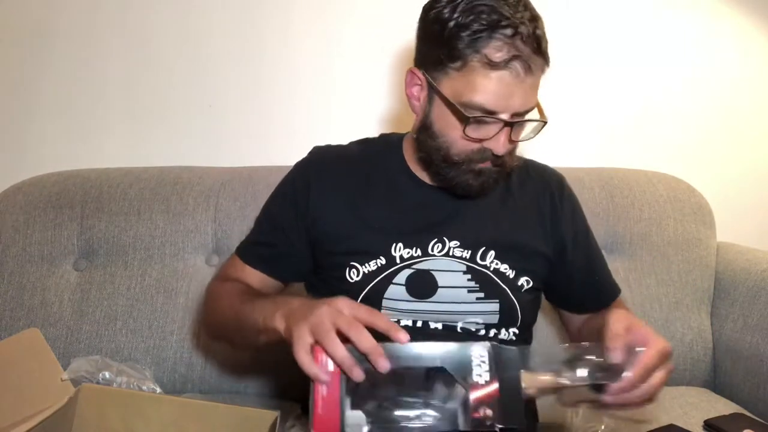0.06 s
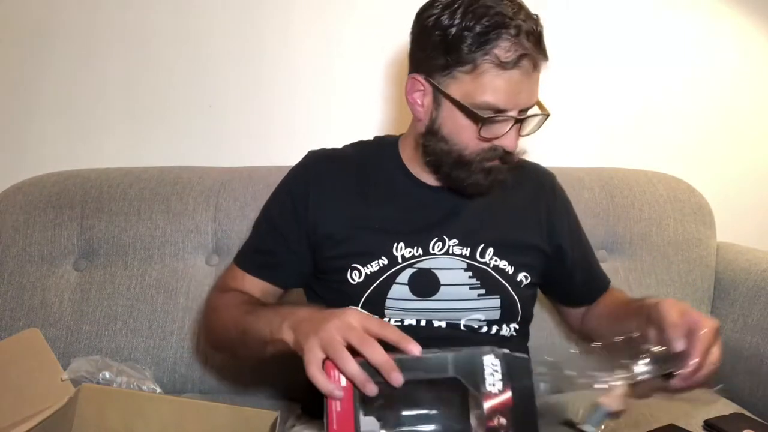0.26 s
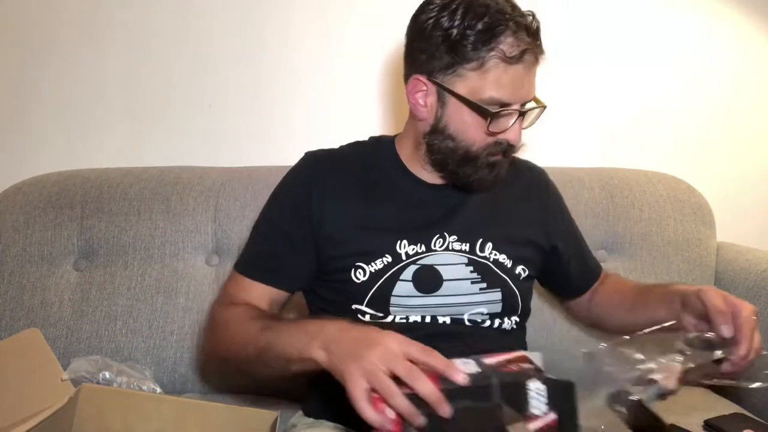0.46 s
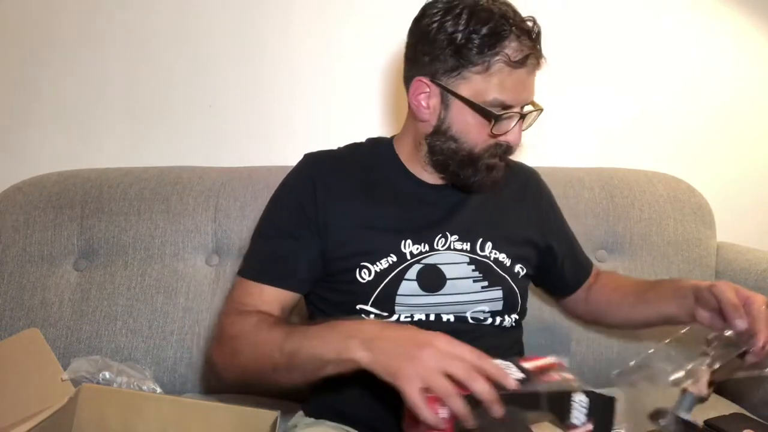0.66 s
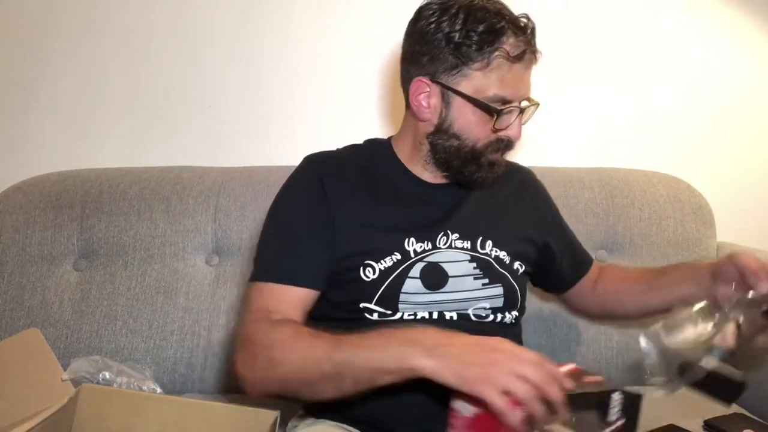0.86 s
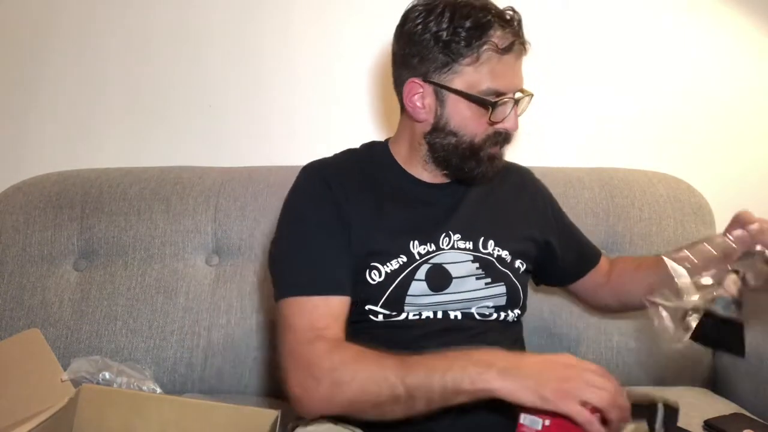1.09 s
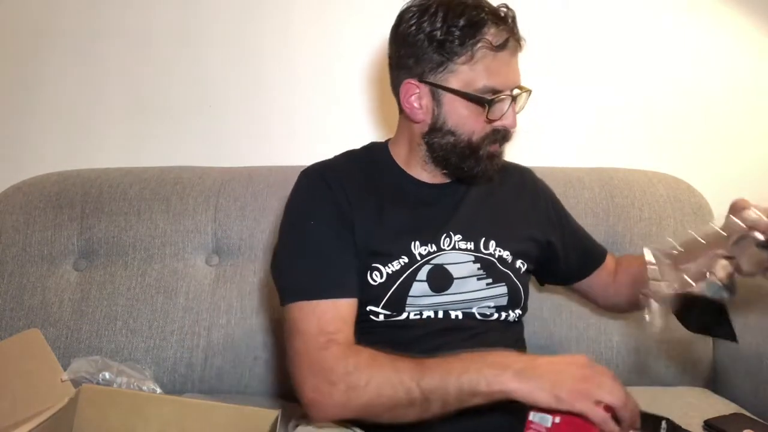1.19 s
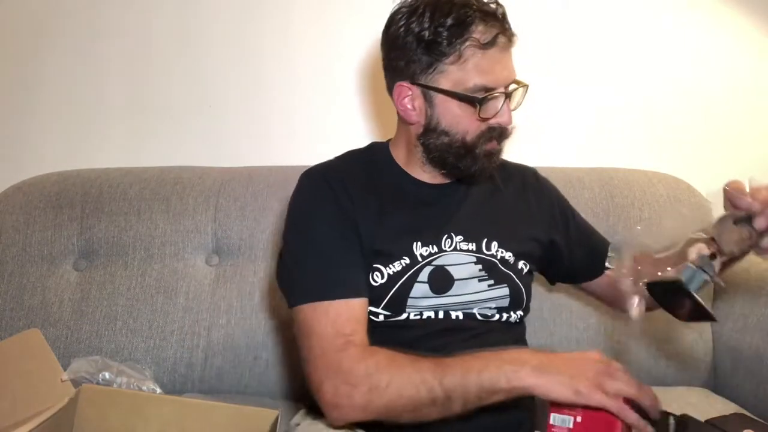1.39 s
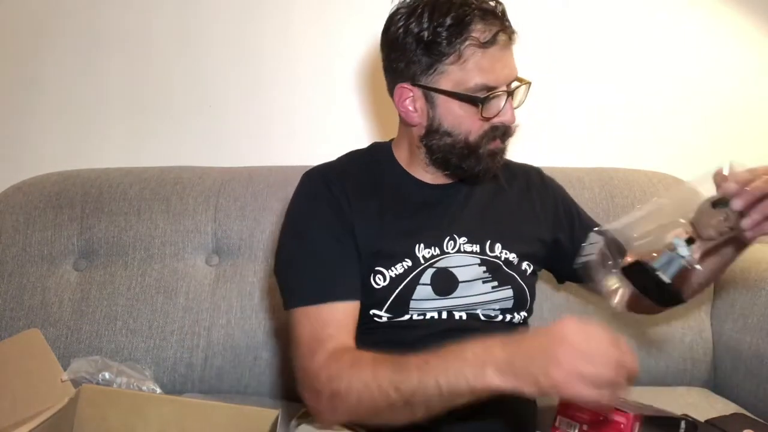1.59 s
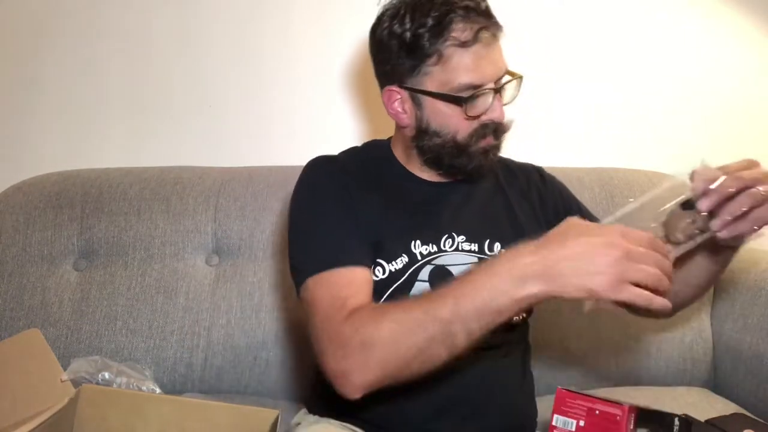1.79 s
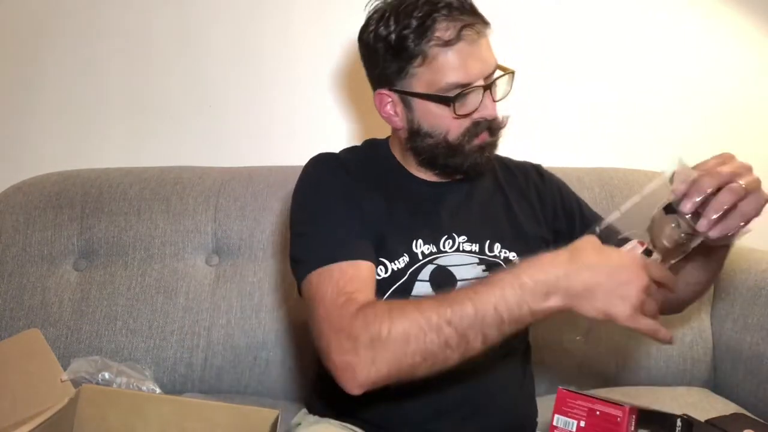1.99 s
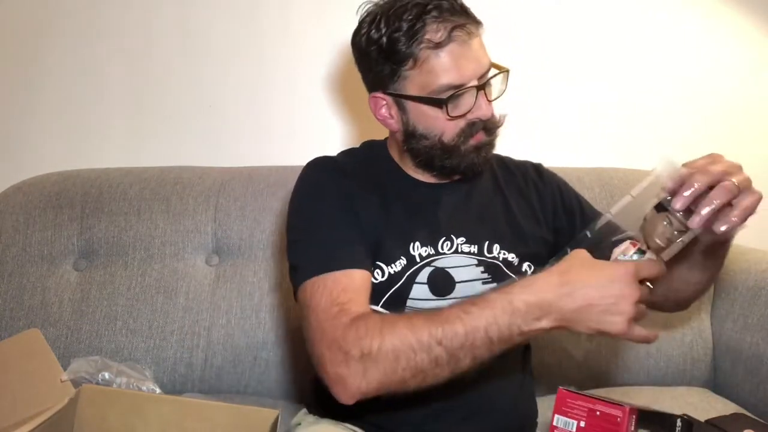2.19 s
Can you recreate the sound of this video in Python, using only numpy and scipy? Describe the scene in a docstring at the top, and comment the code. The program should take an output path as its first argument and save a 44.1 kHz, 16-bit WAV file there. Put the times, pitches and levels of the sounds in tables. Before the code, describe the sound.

Thin plastic packaging juddering and scraping against card, popping free, then soft crinkles and hollow knocks

```python
"""Plastic scrapes and judders along card: a clear tray is pulled out of a cardboard toy box in a living room.
Dense random grains make the scraping and dull rubbing; ringing ticks make crinkles, and a narrow resonance sings.
Dispersed pulses make taps and the double snap as the tray springs free, and chattering grains make rasps.
The empty box is pushed aside with soft rubs, crinkles and hollow taps; fingers take hold of the hollow tray,
which knocks with decaying sines and crackles, over a quiet room tone and diffuse reflections."""
import sys
import numpy as np
from scipy import signal
from scipy.fft import rfft, irfft, next_fast_len
from scipy.io import wavfile

SR = 44100
rng = np.random.default_rng(int(sys.argv[2]) if len(sys.argv) > 2 else 0)


def persist_wave(psi):
    """Save psi, clipped to +-1, as 16-bit WAV."""
    counts = np.round(np.clip(psi, -1, 1) * 32767).astype(np.int16)
    wavfile.write(sys.argv[1], SR, np.atleast_2d(counts).T)


N = 99225   # samples, 2.25 s
TIME_S = np.arange(N) / SR


def amp(db):
    """Decibels to gain."""
    return 10 ** (np.asarray(db) / 20)


def unit(x):
    """Scale to energy 1."""
    return x / np.sqrt(np.sum(x ** 2) + 1e-20)


def at_hz(points, hz):
    """Read a (frequency, value) table on a log-frequency axis."""
    f, v = np.transpose(points)
    return np.interp(np.log(hz + 1), np.log(f), v)


def gain_curve(rows):
    """Join (time, level) rows into a gain per sample."""
    return amp(np.interp(TIME_S, *np.transpose(rows)))


def bins(size):
    """Frequencies of a spectrum in Hz."""
    return np.arange(size // 2 + 1) * SR / size


def shaped(x, db):
    """Causal minimum-phase filter with the given gain per frequency, built by folding the cepstrum."""
    cepstrum = irfft(np.log(amp(np.maximum(db, -90))))
    size = len(cepstrum)
    cepstrum[1:size // 2] *= 2
    cepstrum[size // 2 + 1:] = 0
    response = np.exp(rfft(cepstrum))
    return irfft(rfft(x, size) * response)


def coloured(x, points):
    """Give a long sound a spectrum; rms 1."""
    size = 2 * next_fast_len(N // 2 + 1)
    spectrum = rfft(x, size) * amp(at_hz(points, bins(size)))
    return unit(irfft(spectrum)[:N]) * np.sqrt(N)


def hump(hz, centre_hz, bass_fall, treble_fall):
    """A broad peak with straight flanks, in dB; falls in dB/octave."""
    ratio = ((hz + 1) / centre_hz) ** 8   # the power keeps the top narrow
    bass_loss = bass_fall * np.log2(1 + 1 / ratio)
    treble_loss = treble_fall * np.log2(1 + ratio)
    return -(bass_loss + treble_loss) / 8


def add(out, s, x):
    """Mix a sound in at a time in seconds."""
    i = max(int(s * SR), 0)
    out[i:i + len(x)] += x[:N - i]


def swell(middle_s, length_s):
    """A smooth rise and fall."""
    return np.cos(np.pi * np.clip((TIME_S - middle_s) / length_s, -.5, .5))


def resonated(x, hz, width_hz):
    """One narrow resonance."""
    return signal.lfilter(*signal.iirpeak(hz, hz / width_hz, fs=SR), x)


GRAINS_PER_S, GRAIN_SPREAD_DB = 5600, 2


def grains(size, per_s=GRAINS_PER_S):
    """Tiny slips at random moments, with random sign and uneven strength."""
    strength = amp(GRAIN_SPREAD_DB * np.minimum(rng.exponential(1, size), 4))
    slipping = rng.random(size) < per_s / SR
    return strength * rng.choice([-1, 1], size) * slipping


# Plastic sliding on card, how loud: (time [s], level [dB])
SLIDE = [(0, -51.5), (.1, -56), (.135, -48.5), (.2, -54), (.27, -47), (.315, -47), (.36, -48), (.405, -55),
         (.43, -56), (.62, -70.5), (.72, -63.5), (.8, -78), (1.03, -72.5), (1.07, -62), (1.16, -61.5),
         (1.2, -71.5), (1.3, -63), (1.38, -70), (1.47, -66.5), (1.58, -77.5), (1.93, -78.5), (2.14, -78),
         (2.25, -62)]
# Tone of that scrape: (frequency [Hz], gain [dB])
SLIDE_COLOUR = [(180, -71), (300, 0.5), (685, -3.5), (877, 0.5), (1870, -4.5), (2210, -4.5), (5570, -8),
                (15500, -18)]
SLIDE_GRAINS_PER_S = 5100   # the plastic edge crackles more coarsely than the card


def scrape():
    """Bright friction of plastic on card: dense slips, coloured and ridden in level."""
    return gain_curve(SLIDE) * coloured(grains(N, SLIDE_GRAINS_PER_S), SLIDE_COLOUR)


CRINKLES_PER_S, CRINKLE_DB = 130, -9   # rate over all facets; level relative to SLIDE
CRINKLE_LOW_HZ, CRINKLE_HIGH_HZ, CRINKLE_WIDTH_HZ = 2320, 7540, 240


def crinkles(count=8):
    """The thin sheet buckles as it slides: sparse bright ticks, each ringing one small facet."""
    ticks = np.zeros(N)
    for hz in np.geomspace(CRINKLE_LOW_HZ, CRINKLE_HIGH_HZ, count):
        buckles = grains(N, CRINKLES_PER_S / count) + 1e-18   # tiny offset avoids denormals
        ticks += resonated(buckles, hz, CRINKLE_WIDTH_HZ)
    return amp(CRINKLE_DB) * gain_curve(SLIDE) * unit(ticks) * np.sqrt(N)


# Dull rubbing of hand and card, how loud: (time [s], level [dB])
RUB = [(0, -64), (.09, -75.5), (.14, -49.5), (.19, -59.5), (.24, -48.5), (.32, -52), (.36, -58), (.42, -67),
       (.66, -90), (.72, -55.5), (.82, -84), (1.03, -85.5), (1.15, -75), (1.2, -94), (1.31, -66.5),
       (1.38, -78), (1.46, -60), (1.62, -79), (1.72, -78), (1.81, -72.5), (1.93, -90), (1.98, -51.5),
       (2.07, -70), (2.14, -66), (2.25, -63)]
# Tone of that rubbing: (frequency [Hz], gain [dB])
RUB_COLOUR = [(60, -12), (150, 1.5), (280, -1.5), (480, 3), (750, -9), (1200, -8.5), (3000, -49)]


def card_rub():
    """Dull friction of hand and card: dense slips with a dark spectrum."""
    return gain_curve(RUB) * coloured(grains(N), RUB_COLOUR)


# Steady room noise: (frequency [Hz], gain [dB])
FLOOR = [(15, -58), (25, -9), (91, 1), (169, -7), (313, 1.5), (666, -2.5), (1110, -12.5), (7500, -18.5),
         (13900, -19.5), (15500, -33)]
FLOOR_DB, HUM_HZ, HUM_DB = -67.5, 91, -77.5   # rms levels


def background():
    """Quiet coloured room noise with a low sine hum."""
    hum = amp(HUM_DB) * np.sqrt(2) * np.sin(2 * np.pi * HUM_HZ * TIME_S)
    return amp(FLOOR_DB) * coloured(rng.standard_normal(N), FLOOR) + hum


# Rubbed plastic sings faintly: (middle time [s], length [s], frequency [Hz], width [Hz], level [dB])
SINGING = [(0.12, 0.27, 2487, 44.5, -57.5), (1.293, 0.74, 1710, 54.3, -69.5)]


def singing():
    """Friction keeps one narrow resonance of the sheet going."""
    out = np.zeros(N)
    for middle_s, length_s, hz, width_hz, db in SINGING:
        tone = unit(resonated(grains(N), hz, width_hz)) * np.sqrt(N)
        out += amp(db) * swell(middle_s, length_s) * tone
    return out


SPREAD_S = 0.0011254   # bending waves: delay at 1 kHz, lower ones come later


def contacts(rows, flutter_db, flutter_t60, size=8192):
    """Each contact is a pulse swept downward by the sheet, with dense colourless echoes bouncing about in it."""
    out, hz, t = np.zeros(N), bins(size), np.arange(size) / SR
    sweep = irfft(np.exp(-4j * np.pi * SPREAD_S * np.sqrt(1000 * hz)))
    dying = amp(-60 * t / flutter_t60)
    for s, db, centre_hz, bass_fall, treble_fall in rows:
        echoes = amp(flutter_db) * unit(rng.standard_normal(size) * dying)
        flat = irfft(np.exp(1j * np.angle(rfft(sweep + echoes))))   # keep phase, flatten spectrum
        pulse = flat * dying ** .25
        knock = unit(shaped(pulse, hump(hz, centre_hz, bass_fall, treble_fall)))
        add(out, s - .0003, amp(db) * np.sqrt(.01 * SR) * knock)   # energy counted as rms over 10 ms
    return out


# Contacts on the thin plastic, level before the tray rings:
# (time [s], level [dB], centre [Hz], bass fall [dB/octave], treble fall [dB/octave])
TAPS = [(0.114, -46, 2550, 6.5, 11.5), (0.209, -45, 1500, 10, 5), (0.2115, -41.5, 734, 26, 12.5),
        (0.232, -40, 980, 9.5, 6), (0.2525, -43, 605, 5.5, 15), (0.276, -56, 3620, -2.5, 16),
        (0.281, -36, 3020, 11.5, 14), (0.292, -37.5, 2400, 4.5, 5.5), (0.387, -45.5, 423, -3, 5),
        (0.4016, -45.5, 3570, 2.5, 4.5), (0.689, -64, 5950, -9, 9), (0.699, -58, 600, 8.5, 4.5),
        (0.898, -68, 4500, 5, 20), (0.983, -61.5, 3970, 3, 9), (1.048, -57.5, 3950, 37, 49),
        (1.050, -58, 1460, 19, 35), (1.138, -54.5, 1200, 1, 8), (1.238, -52.5, 1900, 1.5, 7),
        (1.283, -58, 1200, 4.5, 17), (1.297, -55.5, 680, -1.5, 15), (1.579, -55.5, 1120, 6, 24),
        (1.750, -57.5, 1474, 3, 10.5), (1.9505, -45.5, 1230, 12, 11), (1.9545, -41, 1190, 2, 11),
        (1.963, -50, 560, 8, 10), (1.979, -42, 1170, 3.5, 12), (2.0155, -45, 1770, 2, 12.5),
        (2.0465, -44.5, 1500, 1, 13.5), (2.049, -41.5, 805, 5.5, 21.5), (2.182, -49.5, 1900, 10, 15),
        (2.1942, -42, 2080, 17.5, 23), (2.1965, -41.5, 1270, 6.5, 27), (2.219, -50, 2020, 14, 36),
        (2.232, -48.5, 980, 5, 11)]


def taps():
    """Light knocks that set the thin sheet fluttering."""
    return contacts(TAPS, flutter_db=3, flutter_t60=0.059)


# Bursts of fast stick and slip, level before the tray rings:
# (time [s], length [s], level [dB], centre [Hz], bass fall [dB/octave], treble fall [dB/octave])
RASPS = [(0.153, 0.021, -50, 3800, 11, 19), (0.230, 0.028, -41, 3820, 0.5, 2),
         (0.287, 0.014, -36.5, 4560, 0.5, 2.5), (0.385, 0.026, -49, 3970, 0, 24),
         (0.893, 0.078, -67.5, 4470, 21.5, 18), (1.12, 0.067, -58, 5000, -3, 9),
         (1.433, 0.017, -60, 497, 3.5, 5), (1.511, 0.024, -65.5, 790, 3.5, 14),
         (1.796, 0.024, -56.5, 260, -2.5, 5.5), (1.951, 0.097, -63.5, 4560, 11, 20.5),
         (2.1695, 0.012, -49.5, 4750, -4, 13)]
RASP_SLIPS_PER_S = 2200


def rasps(size=4096):
    """An edge catches and chatters along the card for a moment: slips that hold, then fade out."""
    out, t = np.zeros(N), np.arange(size) / SR
    for s, length, db, centre_hz, bass_fall, treble_fall in RASPS:
        fade = np.clip((length - t) / (0.48 * length), 0, 1)
        slips = grains(size, RASP_SLIPS_PER_S) * fade
        chatter = unit(shaped(slips, hump(bins(size), centre_hz, bass_fall, treble_fall)))
        add(out, s, amp(db) * np.sqrt(length * SR) * chatter)
    return out


RADIATION_LOW_HZ = 134   # light packaging radiates little below this


def radiated(x):
    """Small light panels lose their deep bass."""
    return signal.sosfilt(signal.butter(3, RADIATION_LOW_HZ, "high", fs=SR, output="sos"), x)


def body(x, modes):
    """The direct sound plus the ringing modes that it drives."""
    out = x.copy()
    for hz, db, t60 in modes:
        r = amp(-60 / (t60 * SR))   # decay per sample
        poles = [1, -2 * r * np.cos(2 * np.pi * hz / SR), r * r]
        ring = signal.lfilter([1, 0, -1], poles, x + 1e-18)
        out += amp(db) * (1 - r * r) / 2 * ring
    return out


# Ringing of the tray held free: (frequency [Hz], gain [dB], t60 [s])
TRAY_MODES = [(535, 4, 0.039), (661.6, 14, 0.15), (1012, 1.5, 0.051), (1159, 0.5, .1), (2110, 2.5, 0.088)]


def tray_ring(x):
    """Taps and rasps drive the modes of the free tray."""
    return body(x, TRAY_MODES)


# Soft knocks that ring only the hollow of the tray: (time [s], level [dB], frequency [Hz])
TOCKS = [(0.2115, -38, 677), (0.219, -32.5, 517), (0.2405, -37, 544), (1.128, -47, 697), (1.151, -50, 253),
         (1.240, -49.5, 700), (1.303, -56.5, 668), (1.579, -39.5, 687)]
TOCK_ATTACK_S, TOCK_T60_S = 0.0012, 0.1


def tocks():
    """At each knock one hollow mode swells quickly and dies; its pitch depends on the grip."""
    out = np.zeros(N)
    attack = 1 - np.exp(-TIME_S / TOCK_ATTACK_S)
    for s, db, hz in TOCKS:
        decay = amp(db - 60 * TIME_S / TOCK_T60_S)
        add(out, s, decay * attack * np.sin(2 * np.pi * hz * TIME_S))
    return out


BUMP_S, BUMP_LENGTH_S, BUMP_HZ, BUMP_DB = 0.34, 0.084, 76.2, -57   # middle time; peak level


def bump():
    """The box shifts as a whole: a few slow cycles under a smooth swell."""
    return amp(BUMP_DB) * swell(BUMP_S, BUMP_LENGTH_S) * np.sin(2 * np.pi * BUMP_HZ * TIME_S)


# The tray's rim springs past the box edge and rattles back, level before the box rings:
# (time [s], level [dB], centre [Hz], bass fall [dB/octave], treble fall [dB/octave])
SNAPS = [(0.4356, -25, 1730, 10.5, 10), (0.4405, -26.5, 1370, 6, 8.5), (0.4408, -27, 5420, 7.5, 13.5),
         (0.4445, -44, 1716, 8.5, 7.5), (0.462, -41.5, 990, 4, 11), (0.507, -57.5, 393, 0.5, 7)]
# Ringing of the tray in the box: (frequency [Hz], gain [dB], t60 [s])
BOX_MODES = [(183, 12, 0.046), (258.6, 16, 0.098), (335, 8, 0.13), (499, -3.5, 0.072), (1236, -2.5, 0.14),
             (1433, -3, 0.074), (1605, 2, 0.043), (2433, 4.5, 0.04), (3162, 9.5, 0.26), (4700, 1.5, .04)]


def snaps():
    """The rim's sharp contacts drive the modes of tray and box together."""
    return body(radiated(contacts(SNAPS, flutter_db=3.5, flutter_t60=0.071)), BOX_MODES)


# Decay of the reflections: (frequency [Hz], t60 [s])
ROOM_T60 = [(100, 0.39), (260, 0.35), (700, 0.43), (1800, 0.36), (5000, 0.52), (13000, 0.2)]
# Tone of the reflections: (frequency [Hz], gain [dB])
ROOM_COLOUR = [(100, 6), (260, 4.5), (700, 3), (1900, 2), (3500, -1.5), (7000, 0.5), (14000, 1.5)]
ROOM_DB, FIRST_ECHO_S = -9.5, 0.01   # the tail is half faded in at FIRST_ECHO_S


def room(x, size=32768):
    """Diffuse reflections: a noise tail whose octave bands each die at their own rate."""
    t, hz = np.arange(size) / SR, bins(size)
    white, tail = rfft(rng.standard_normal(size)), np.zeros(size)
    for centre in 62.5 * 2 ** np.arange(9):
        share = np.clip(1 - abs(np.log2((hz + 1) / centre)), 0, 1)   # overlapping octave bands
        band = irfft(white * share * amp(at_hz(ROOM_COLOUR, hz)))
        tail += band * amp(-60 * t / at_hz(ROOM_T60, centre))
    fade_in = np.clip(t / FIRST_ECHO_S - .5, 0, 1)
    return amp(ROOM_DB) * signal.fftconvolve(x, unit(tail * fade_in))[:N]


TOCK_ROOM_DB = -7   # level of the hollow knocks sent to the room


def scene():
    """Mix the packaging sounds, their reflections and the room tone."""
    rubbing = scrape() + card_rub() + crinkles()
    touches = radiated(taps() + rasps())
    hollow = tocks()
    box = snaps()
    direct = rubbing + singing() + tray_ring(touches) + hollow + bump() + box
    # the touches reach the room without the tray's ringing
    reflected = room(rubbing + touches + amp(TOCK_ROOM_DB) * hollow + box)
    return (direct + reflected + background())[None]


# Tone of the microphone: (frequency [Hz], gain [dB])
MIC_COLOUR = [(2800, -1), (6500, -3), (9000, -6), (15000, -8.5)]
MIC_LOW_HZ, CUTOFF_HZ = 32, 15900


def record(dry, size=131072):
    """The small microphone thins the deep bass and softens the treble; the top is cut steeply."""
    x = shaped(dry[0], at_hz(MIC_COLOUR, bins(size)))[None, :N]
    x = signal.sosfilt(signal.butter(2, MIC_LOW_HZ, "high", fs=SR, output="sos"), x)
    return signal.sosfilt(signal.ellip(10, .2, 70, CUTOFF_HZ, fs=SR, output="sos"), x)


dry = scene()
out = record(dry)
persist_wave(out)
```